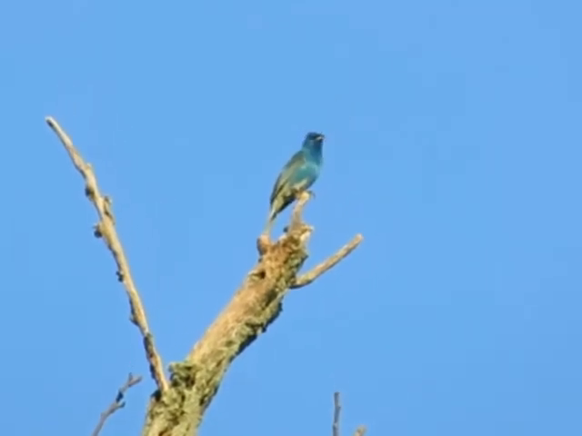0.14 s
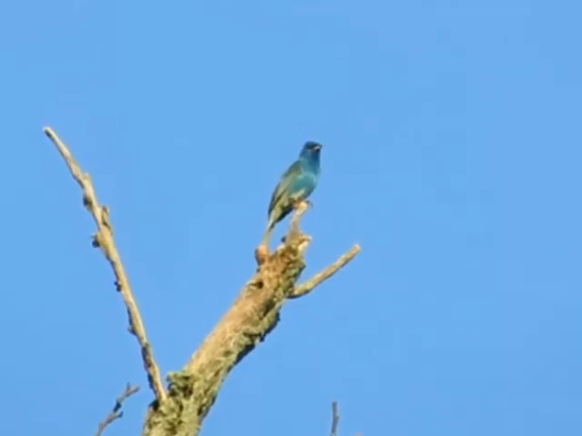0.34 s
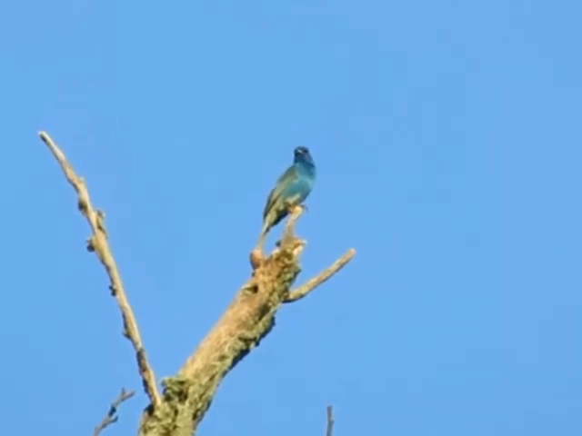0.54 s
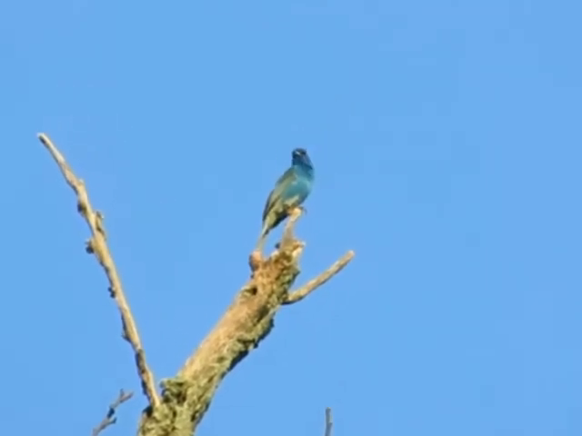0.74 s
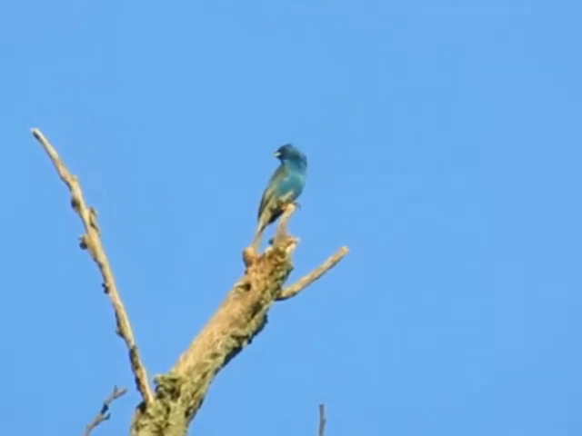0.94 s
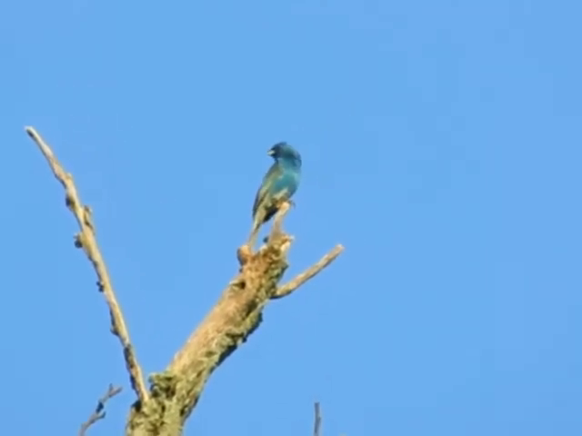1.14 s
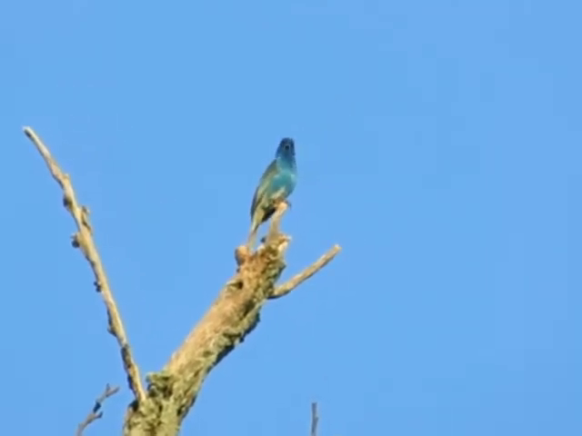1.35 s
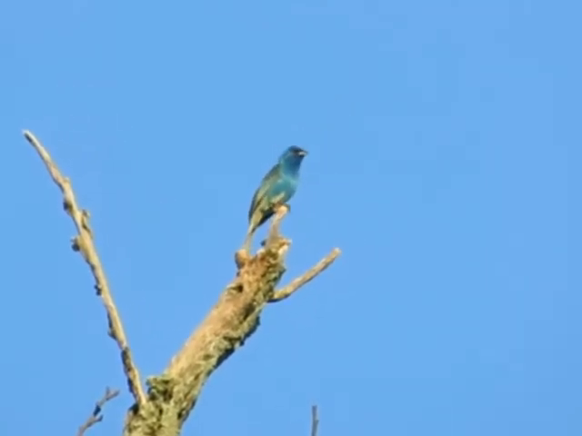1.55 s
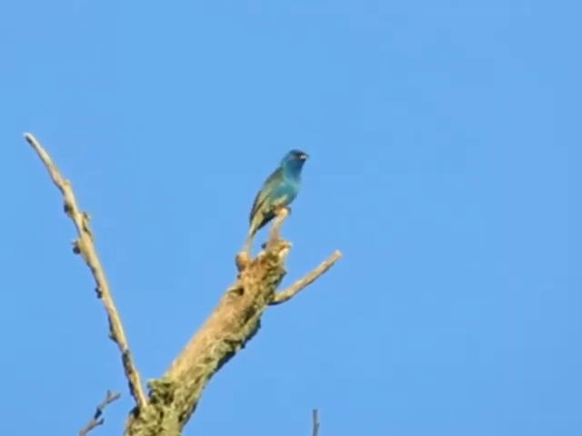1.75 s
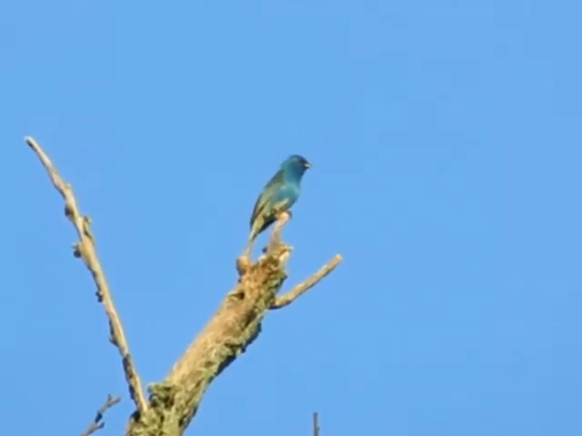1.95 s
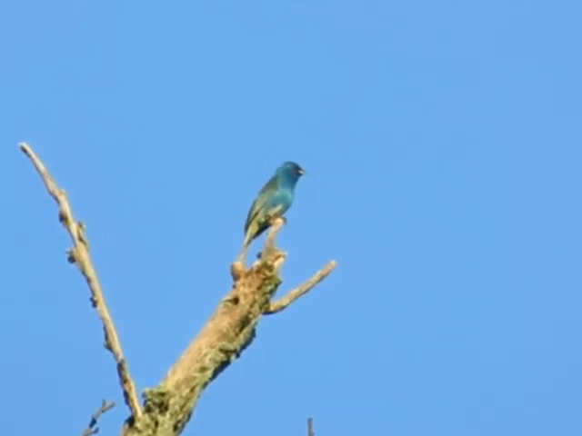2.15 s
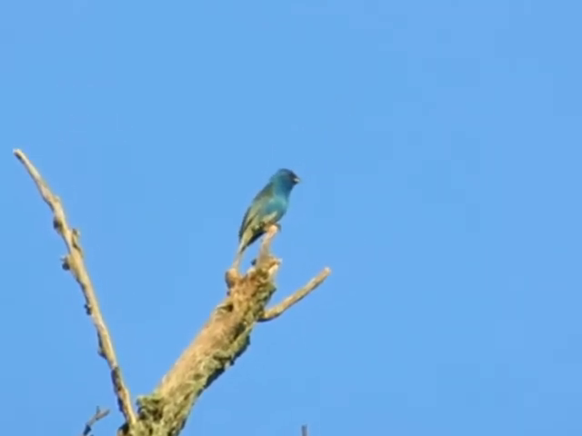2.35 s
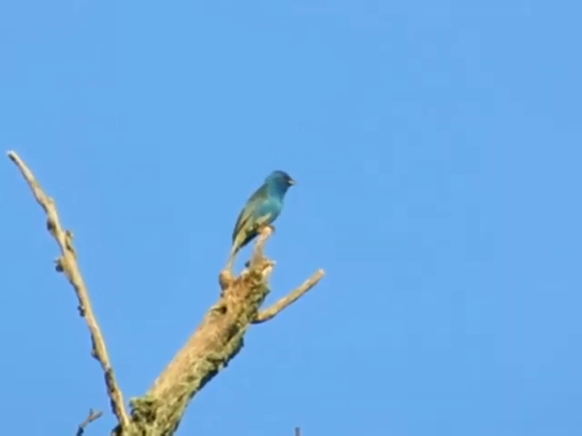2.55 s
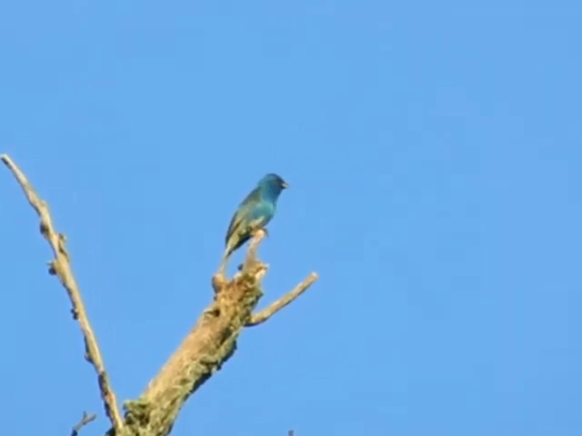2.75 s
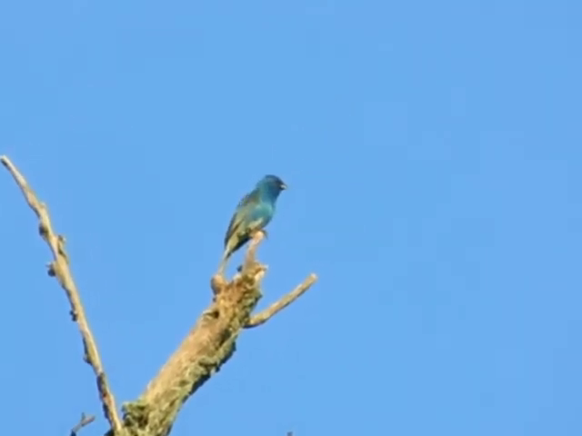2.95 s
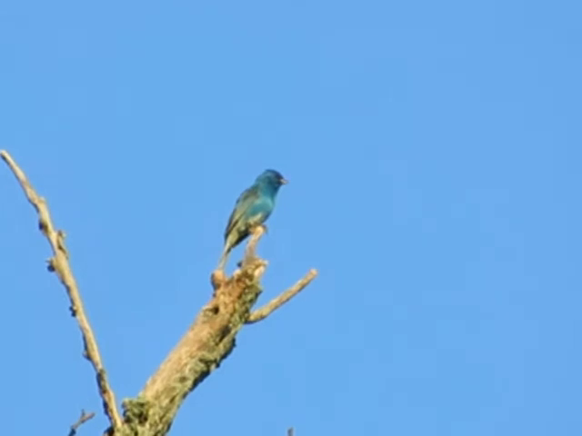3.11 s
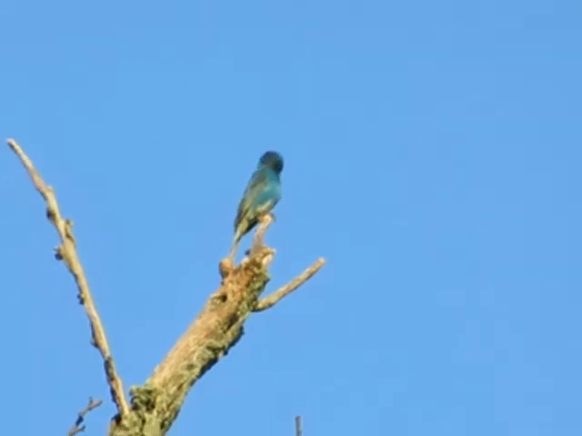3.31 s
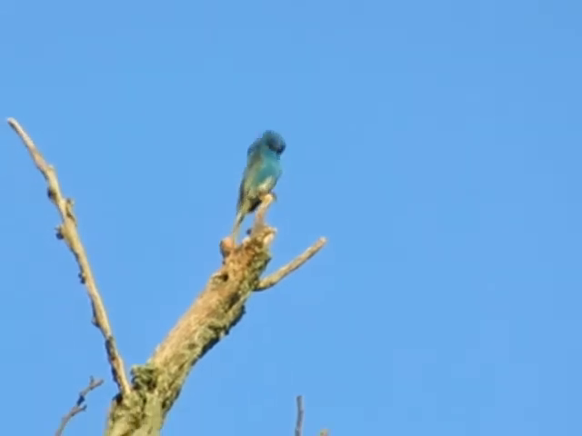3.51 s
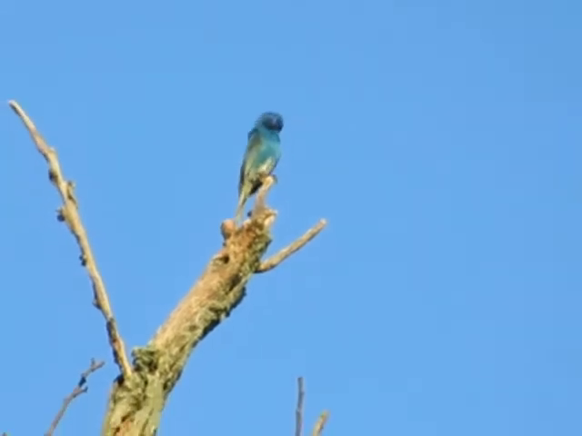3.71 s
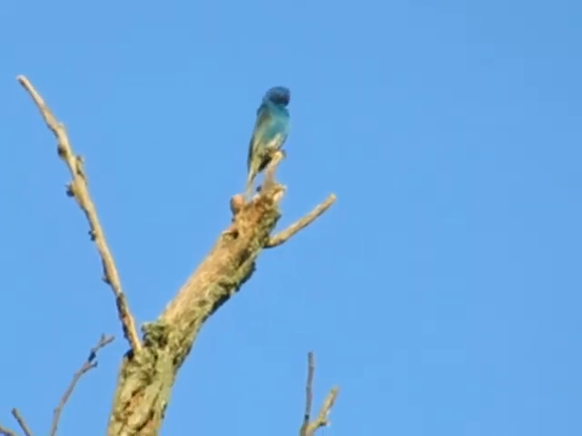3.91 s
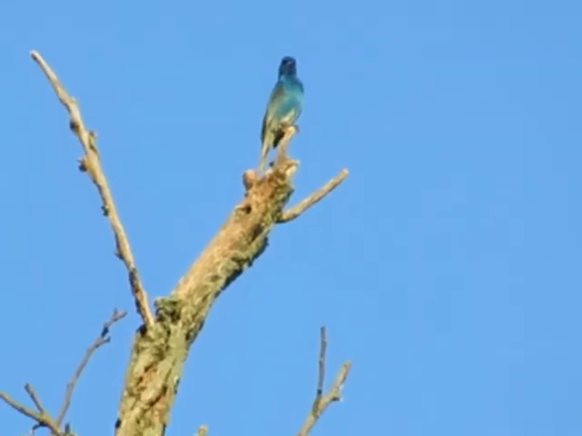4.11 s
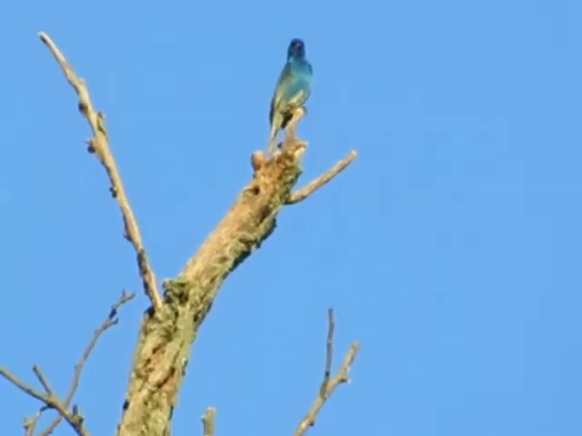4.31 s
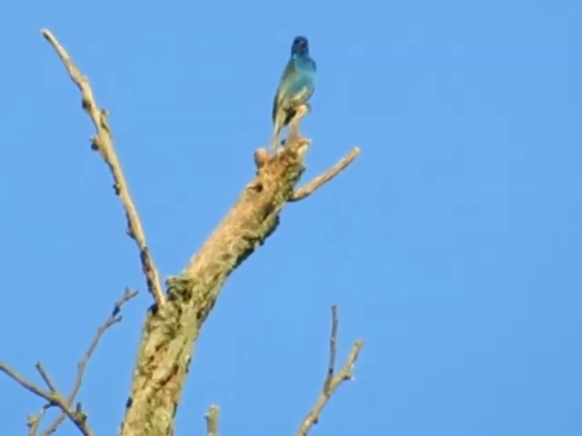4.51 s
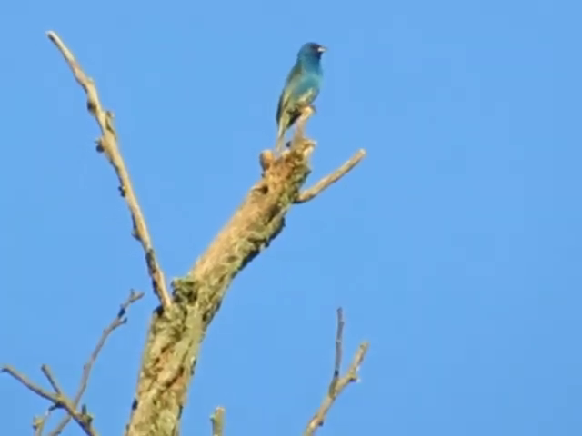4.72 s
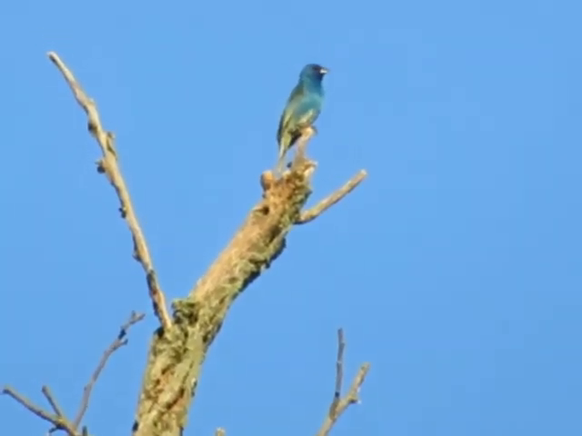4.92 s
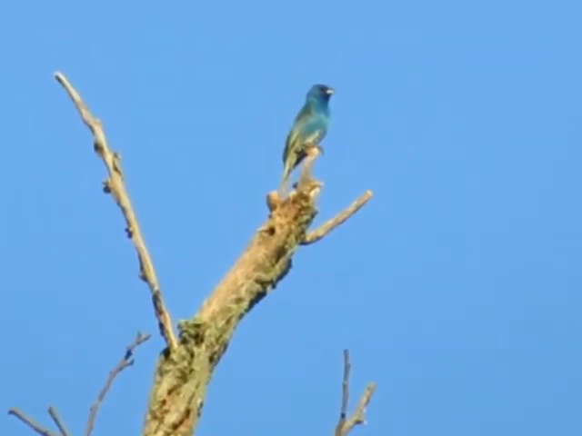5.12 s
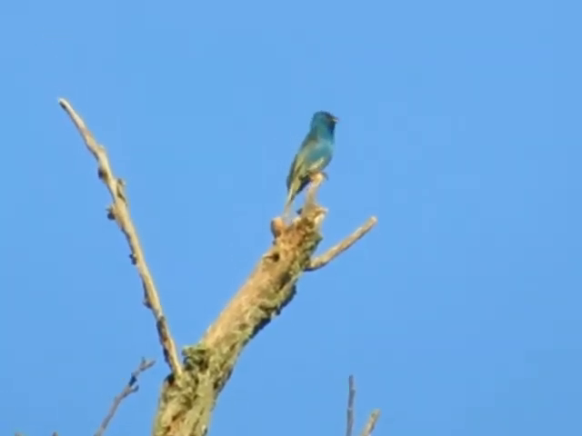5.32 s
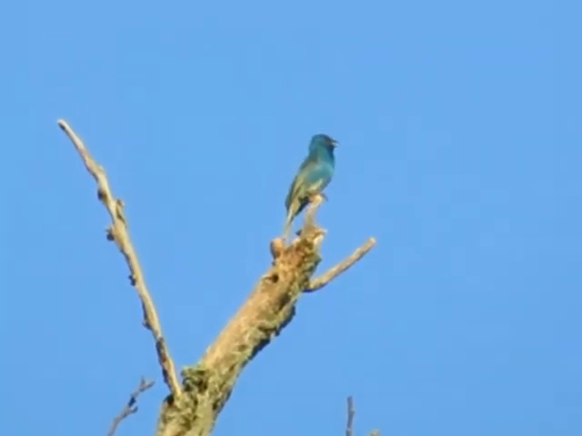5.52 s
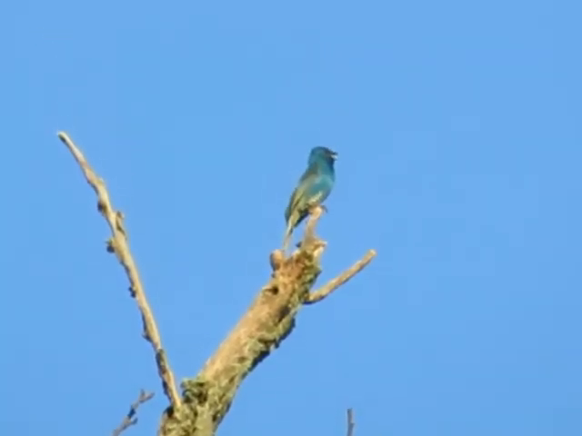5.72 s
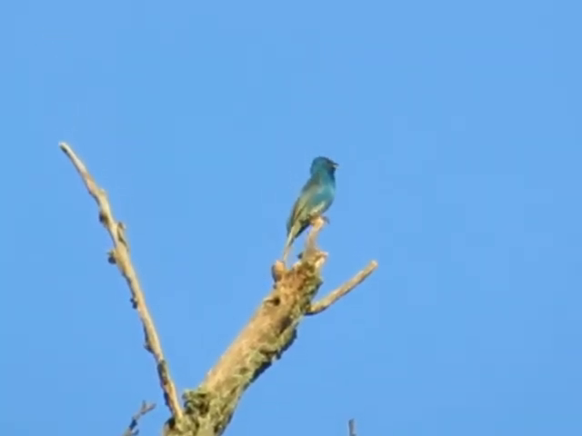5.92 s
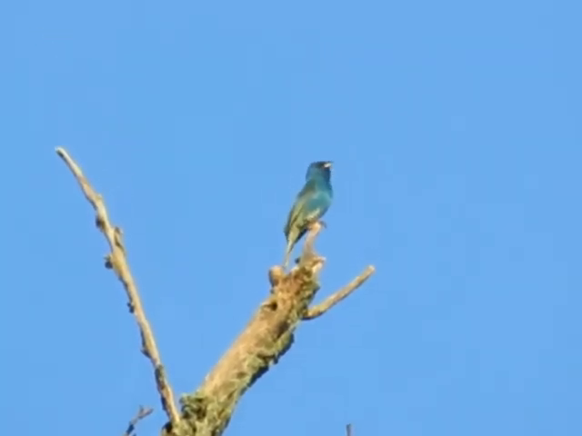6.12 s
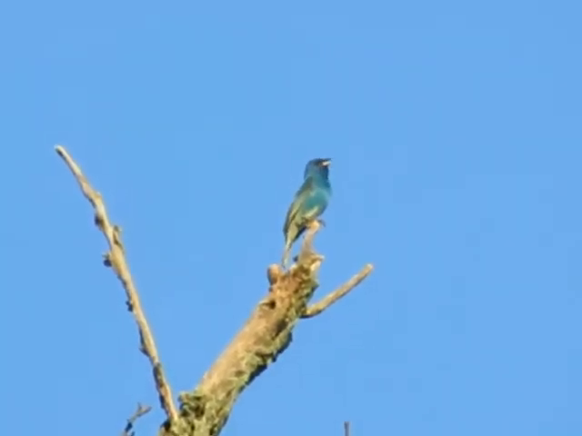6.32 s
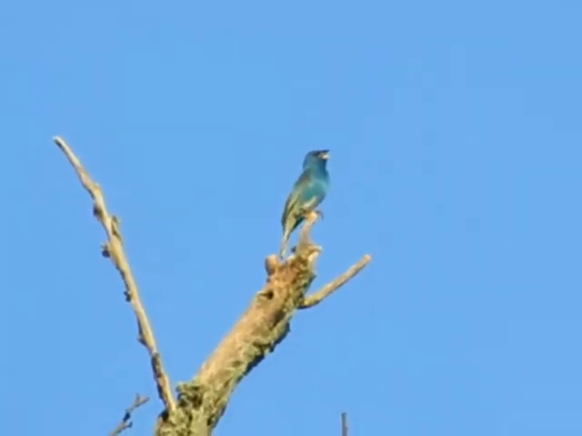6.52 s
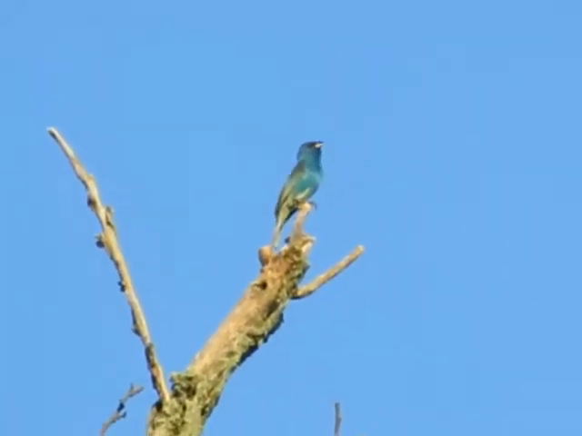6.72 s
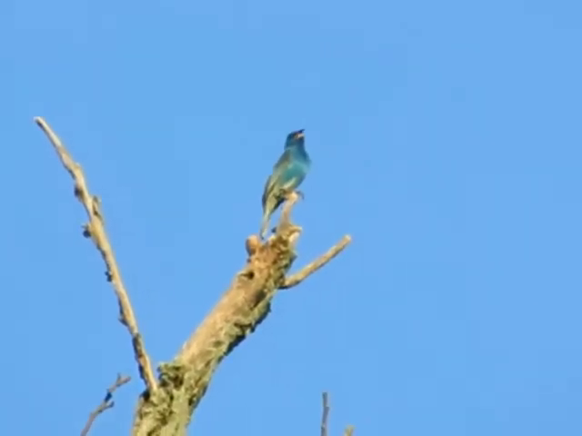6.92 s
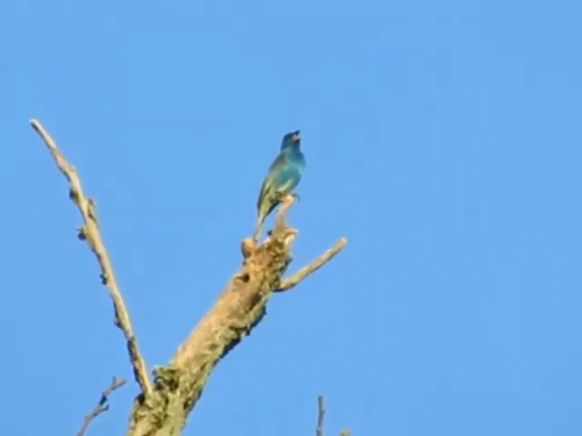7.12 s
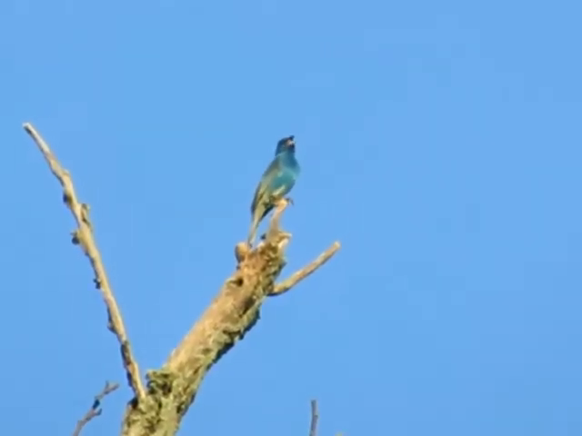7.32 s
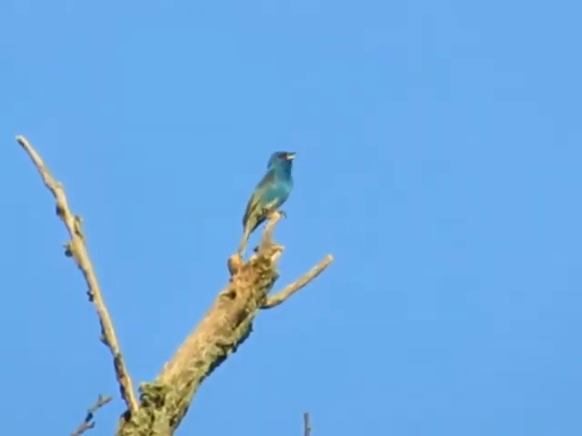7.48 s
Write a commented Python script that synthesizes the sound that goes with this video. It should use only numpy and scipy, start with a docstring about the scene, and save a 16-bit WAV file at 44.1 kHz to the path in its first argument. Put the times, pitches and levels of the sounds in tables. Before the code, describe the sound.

High paired bird notes grow from faint to bright above constant cricket trilling, with distant birds calling, a soft katydid rasp and one twig snap.

```python
"""A small songbird sings a rising series of paired whistles, sweeps and buzzes: near-pure gliding tones.
Other birds call further off with simpler gliding tones, and some hoarsely, with pitch that jumps about.
Crickets trill as narrow bands of noise and one pulsed tone; a katydid rasps in swells of high noise.
A twig snaps as a short dying ring, and traffic, leaves and hiss are coloured noise.
Trees scatter the birds and the snap back as a diffuse tail; a close pair of microphone ports listens."""
import sys
import numpy as np
from scipy import signal
from scipy.fft import rfft, irfft, next_fast_len
from scipy.io import wavfile
from scipy.ndimage import uniform_filter1d

SR = 44100
rng = np.random.default_rng(int(sys.argv[2]) if len(sys.argv) > 2 else 0)


def master(y):
    """Save y as 16-bit WAV."""
    cut = np.clip(np.atleast_2d(y).T, -1, 1)
    pcm = np.round(cut * 32767)  # scale
    wavfile.write(sys.argv[1], SR, pcm.astype(np.int16))


N = 332955
T = np.arange(N) / SR   # time of every sample in seconds
CUTOFF_HZ = 15500       # top of the sound

# Traffic, leaves and hiss, the same in both ports. Each row: pitch in Hz, level in dB per Hz.
AIR_SAME = [(25, -83), (45, -72.5), (63, -69.5), (92, -75.5), (120, -71.5), (165, -77.5), (250, -82.5),
            (500, -88), (1000, -92.5), (1700, -97.3), (3000, -101), (4300, -101), (6300, -104),
            (7500, -110), (10000, -117), (12000, -123), (14500, -133)]
# The part of it that is opposite in the two ports. Each row: pitch in Hz, level in dB per Hz.
AIR_OPPOSITE = [(25, -118), (60, -104), (120, -91.5), (250, -83), (1000, -90.5), (1700, -93.5), (4300, -99),
                (6300, -102), (7500, -105), (10000, -109), (12000, -112), (14500, -116)]
# Bands in which the hiss flickers, each reaching up to the next. Each row: low edge in Hz, spread in dB.
FLICKER_BANDS = [(800, 1.3), (1200, 1.3), (1800, 1.3), (2600, 1.3), (3500, 1.3), (4500, .5), (6200, 2),
                 (7600, 3), (9000, 4.5), (10200, 4.5), (11500, 5.5), (13000, 6)]

# Far cricket chorus. Each row: pitch in Hz, width of each resonance in Hz,
# average level in dB of the part alike in both ports, and of the part opposite in them.
CRICKET_CHORUS = [(5172, 250, -63.5, -76), (5340, 190, -60, -59.5), (5830, 150, -74, -80),
                  (10700, 100, -90, -85)]
# One near cricket. The row: pitch in Hz, pulses per second, sounding share of a pulse (0-1), level in dB.
NEAR_CRICKET_WING = (5366, 38.45, 0.72, -53)
# The katydid's rasps. Each row: middle of the rasp in seconds, level in dB.
KATYDID_RASPS = [(.45, -66), (1.52, -68), (2.52, -72), (3.032, -68), (3.76, -65), (4.65, -64.5),
                 (5.55, -62)]
# A twig snaps. The row: level in dB, ringing pitch in Hz, decay time in seconds.
TWIG_SNAP = (-26.5, 2500, 0.00089)
SNAP_START_S = 6.6812

# Hoarse chirps of distant birds. Each row: start in seconds, end in seconds, first pitch in Hz,
# last pitch in Hz, random pitch scatter in Hz, level in dB.
HOARSE_CHIRPS = [(0.8, .862, 4350, 4800, 298, -55.5), (.843, 0.908, 3750, 3750, 250, -64.5),
                 (2.454, 2.537, 4440, 4700, 303, -59.5), (2.575, 2.61, 4400, 4250, 250, -64),
                 (2.789, 2.828, 4730, 4400, 200, -56.5), (2.82, 2.858, 3850, 3700, 150, -65)]
# Single faint gliding tones, mostly distant birds; the highest, at .42 and 4.65 s, go with the katydid's
# rasps. Each row: start in seconds, length in seconds, first pitch in Hz, last pitch in Hz, level in dB.
FAINT_GLIDES = [(.1, .075, 2320, 2180, -57), (.42, .065, 7450, 7490, -59), (.62, .06, 1800, 2700, -64),
                (.69, .05, 3750, 3660, -65), (.83, .2, 3780, 3800, -67), (1.02, .06, 2700, 2500, -65),
                (1.36, .05, 2000, 2350, -65), (1.49, .05, 3300, 3080, -62), (1.55, .12, 3080, 3040, -61),
                (1.595, .02, 2550, 2150, -61), (1.615, .05, 2030, 2130, -58), (1.7, .04, 2100, 2260, -60),
                (2.803, .036, 2870, 2970, -54), (2.835, .028, 2720, 2350, -58),
                (2.915, .045, 2350, 2050, -58), (2.41, .06, 2330, 2450, -62), (2.965, .04, 2330, 2250, -63),
                (3.14, .03, 2950, 2800, -63), (3.36, .07, 2270, 2120, -58), (3.9, .07, 2310, 2120, -56),
                (4.65, .11, 8080, 8420, -67), (4.89, .09, 6100, 6300, -60), (4.968, .03, 5620, 4200, -46),
                (5.0, .036, 3590, 5250, -52), (5.18, .035, 5340, 4200, -51), (5.31, .09, 6000, 6250, -56),
                (5.1, .035, 2900, 3020, -58), (5.688, .035, 3650, 4140, -46), (5.64, .045, 3100, 3600, -54),
                (5.95, .06, 4300, 4600, -56), (6.596, .025, 2950, 3600, -43), (6.615, .03, 3600, 2950, -48),
                (6.97, .055, 2000, 1980, -60)]
GLIDE_PEAK, GLIDE_EARLY = .55, .6        # share of the length at the peak; share of the glide done by then
GLIDE_IN_DB, GLIDE_OUT_DB = -8, -6       # level of the two ends against the peak
# Phrases that distant birds repeat, by name. Each row: seconds from the phrase start, pitch in Hz, level in dB.
FAR_PHRASES = { "carol": [(0, 2750, -7), (.025, 3080, 0), (.035, 2700, -6), (.045, 2330, -2),
               (.065, 2450, 0), (.09, 2750, -5), (.113, 2250, -1), (.145, 1830, -3), (.18, 2260, -1),
               (.207, 2400, -5)], "step down": [(0, 3130, -3), (.05, 3130, 0), (.08, 2900, -5),
               (.11, 2280, -7), (.128, 2120, -10)], "warble": [(0, 3300, -6), (.009, 4300, -5),
               (.014, 4450, -30), (.021, 4350, -10), (.031, 3400, -1), (.04, 3680, -3), (.047, 3150, -9),
               (.056, 2900, -6), (.066, 3080, -2), (.076, 3560, -1), (.087, 3050, 0), (.098, 2500, -15)], }
# When distant birds sing them. Each row: phrase name, start in seconds, length in seconds,
# pitch as a multiple of the phrase's own, level in dB.
FAR_SONG = [("warble", 1.755, .098, .99, -49.5), ("carol", 2.1, .205, .995, -56.5),
            ("step down", 6.0, .128, 1.001, -49), ("warble", 3.658, .098, 1.01, -50),
            ("carol", 4.887, .21, 1.005, -57.5), ("warble", 5.122, .098, .995, -48),
            ("carol", 5.36, .21, 1.02, -58)]

# The singer's syllables, learnt gestures, by name. Each row: seconds from the start, pitch in Hz, level in dB.
GESTURES = { "slide": [(0, 4950, -4), (.03, 4350, -5), (.052, 3720, 0), (.068, 3780, -5)],
            "pip": [(0, 3080, -9), (.028, 3540, 0), (.05, 3480, -10)], "long fall": [(0, 8300, -26),
            (.03, 7750, -16), (.065, 6930, -12), (.08, 5830, -2), (.092, 4920, 0), (.109, 4400, -7)],
            "hook": [(0, 3600, -6), (.011, 4120, -3), (.022, 4290, 0), (.035, 3980, -8)],
            "hold and fall": [(0, 4860, -13), (.012, 5020, 0), (.026, 5040, 0), (.036, 5020, -9),
            (.05, 4960, -10), (.074, 4100, -6), (.098, 3470, -7.5), (.118, 3170, -14)],
            "high rise": [(0, 5860, -14), (.02, 6010, -1), (.047, 6340, -1), (.063, 6380, 0)],
            "chip": [(0, 8900, -32), (.0085, 5120, 0), (.0175, 8100, -11)], "arch": [(0, 2930, -21),
            (.052, 3130, -12), (.065, 3810, -10), (.078, 4810, 0), (.092, 4910, -3), (.108, 4940, .5),
            (.127, 4920, -3), (.145, 3660, -11), (.168, 2280, -18)], "climb": [(0, 5950, -5),
            (.019, 7000, 0), (.039, 7550, -6)], "trill": [(0, 4560, -12), (.008, 4600, -2), (.019, 4590, 0),
            (.025, 4380, -15), (.031, 4100, -6), (.039, 3700, -9), (.052, 2560, -16), (.067, 3610, -11),
            (.08, 2570, -17), (.0935, 3550, -7), (.1065, 2530, -20)], "plunge": [(0, 5230, -1.5),
            (.014, 8300, -22), (.021, 7700, -36), (.031, 6950, -21), (.052, 5900, -8), (.063, 5150, 0),
            (.074, 4160, -7), (.104, 3080, -8.5), (.126, 2280, -19.5)], "swell": [(0, 2520, -19),
            (.01, 3690, -11), (.025, 4300, -7), (.037, 4450, -15), (.048, 4540, -6), (.058, 4550, -11),
            (.066, 4560, 2.5), (.077, 4560, -2.5), (.089, 4550, -4), (.097, 4540, -20)], }
# The song, mostly in pairs and growing louder. Each row: syllable name, start in seconds,
# length in seconds, pitch as a multiple of the gesture's own, level in dB.
SINGER_SONG = [("slide", 4.27, .067, 1.005, -55), ("pip", 4.47, .05, 1.005, -59),
               ("slide", 4.522, .065, .995, -53), ("pip", 4.7, .05, .995, -61),
               ("slide", 4.75, .077, .995, -49.5), ("long fall", 5.032, .109, 1.005, -49.5),
               ("hook", 5.15, .032, .995, -47), ("long fall", 5.308, .109, .995, -42.5),
               ("hook", 5.42, .038, 1.005, -43), ("hold and fall", 5.552, .122, 1.005, -41.5),
               ("high rise", 5.68, .065, 1.005, -43), ("hold and fall", 5.826, .116, .995, -36),
               ("high rise", 5.955, .06, .995, -40.5), ("chip", 6.0965, .017, .99, -38),
               ("arch", 6.135, .168, 1.01, -30.5), ("chip", 6.3865, .018, 1.01, -35.5),
               ("arch", 6.42, .167, .99, -29.5), ("climb", 6.731, .037, 1.005, -42),
               ("trill", 6.768, .107, .995, -27.5), ("climb", 7.021, .041, .995, -39),
               ("trill", 7.062, .106, 1.005, -26.5), ("plunge", 7.266, .126, 1.001, -28.5),
               ("swell", 7.416, .094, 1.001, -27)]
# Upper partials, multiples of the main tone: almost none near 9 kHz, strongest near 12.5 kHz.
# Each row: the partial's own pitch in Hz, level in dB against the main tone when that stands at -31 dB.
UPPER_PARTIALS = [(9000, -65), (10500, -32), (12500, -21.5), (13700, -28), (15000, -31)]
# The singer's buzzed notes. Each row: start in seconds, end in seconds, level in dB.
BUZZED_NOTES = [(6.6642, 6.735, -36), (6.9516, 7.024, -36)]
BUZZ_START_HZ, BUZZ_END_HZ = 6030, 5660        # middle of the pitch swing
VIBRATO_HZ, BUZZ_SWING_HZ = 150.5, 660         # swings per second; size of the swing at the start
BUZZ_DIP_DB = 4                                # by the end, this much quieter at the top of a swing
BUZZ_ROUGH_HZ, BUZZ_ROUGH_DB = 55, 2.0         # random pitch and level

# The singer starts facing away, so the trees return more of the early song.
# Each row: time in seconds, level sent to the trees in dB.
SINGER_TO_TREES = [(5.9, -6.5), (6.3, -9.5)]
TREES_T60_S, TREES_CUT_HZ = 0.7, 9000          # time for the tail to fall by 60 dB; dullness
EARLY_T60_S, EARLY_DB = .2, -3                 # the nearest crowns give an extra, quickly dying start


def amp(db):
    """Turn dB into a plain multiplier."""
    return 10 ** (np.asarray(db) / 20)


def rms_one(x):
    """Scale a sound so that its average (rms) level is 1."""
    return x / np.sqrt(np.mean(x ** 2) + 1e-20)


def drift(rate_hz):
    """Smooth random wandering with spread 1, made at a fortieth of the sample rate."""
    r = np.exp(-80 * np.pi * rate_hz / SR)
    noise = rng.standard_normal(N // 40 + 2002)
    slow = signal.lfilter([1], [1, -2 * r, r * r], noise)[2000:]   # drop the run-in
    return np.interp(np.arange(N) / 40, np.arange(len(slow)), rms_one(slow))


def resonance(x, hz, width_hz):
    """Let through a narrow band, as a ringing body does, with gain 1 at its peak."""
    r = np.exp(-np.pi * width_hz / SR)
    top = np.array([1, 0, -1]) * (1 - r * r) / 2
    return signal.lfilter(top, [1, -2 * r * np.cos(2 * np.pi * hz / SR), r * r], x)


def lagged(x, lag_s):
    """Sound from one side: it reaches the left port later than the right (earlier if negative)."""
    return np.array([np.interp(T - lag_s, T, x), x])


def air(spectrum):
    """Coloured noise, steady in the bass, flickering band by band above, most in the treble."""
    size = next_fast_len(N)
    hz = np.maximum(np.arange(size // 2 + 1) * SR / size, 1)
    table_hz, table_db = np.transpose(spectrum)
    colour = amp(np.interp(np.log(hz), np.log(table_hz), table_db)) * np.sqrt(SR / 2)
    noise = rfft(rng.standard_normal(size)) * colour
    out = irfft(noise * (hz < FLICKER_BANDS[0][0]), size)[:N]
    for (low_hz, spread_db), (high_hz, _) in zip(FLICKER_BANDS, FLICKER_BANDS[1:] + [(CUTOFF_HZ, 0)]):
        band = irfft(noise * (hz >= low_hz) * (hz < high_hz), size)[:N]
        # the subtracted part keeps the average power about the same
        out += amp(spread_db * (drift(9.0) - spread_db / 9)) * band
    return out


def cricket_chorus():
    """Many far wings blur into narrow noise bands whose level wavers."""
    out = np.zeros((2, N))
    for hz, width_hz, same_db, opposite_db in CRICKET_CHORUS:
        noise = rng.standard_normal((2, N))
        same, opposite = resonance(resonance(noise, hz, width_hz), hz, width_hz)
        swell = amp(1.06 * drift(14.0))
        out += swell * (amp(same_db) * rms_one(same) + amp(opposite_db) * rms_one(opposite) * [[1], [-1]])
    return out


def near_cricket():
    """One near wing keeps its separate pulses; each stroke slows a little, so its pitch sags."""
    hz, per_s, share, db = NEAR_CRICKET_WING
    turn = (per_s * T + 0.03 * drift(1.7)) % 1   # place within the pulse, 0 to 1
    stroke = np.minimum(2.2 * np.sin(np.pi * np.clip(turn / share, 0, 1)), 1)   # steep edges, flat top
    pitch = hz + 12 * drift(8.2) - 60 * (turn - share / 2)
    uneven_db = 2.2 * drift(12.0)
    wing = amp(db + uneven_db) * stroke * np.sin(2 * np.pi * np.cumsum(pitch) / SR)
    return lagged(wing, 2.6e-5)


def katydid():
    """Each rasp is a swell of high noise, mostly opposite in the two ports."""
    swell = sum(amp(db) * np.exp(-((T - s) / 0.041) ** 2) for s, db in KATYDID_RASPS)
    band = signal.butter(2, [7100, 8500], "band", fs=SR, output="sos")
    same, opposite = signal.sosfilt(band, rng.standard_normal((2, N)))
    return swell * (amp(-8) * rms_one(same) + rms_one(opposite) * [[1], [-1]])


def twig_snap():
    """A click rings for a few cycles and dies away."""
    db, hz, decay_s = TWIG_SNAP
    t = np.clip(T - SNAP_START_S, 0, 1)
    return amp(db) * np.sin(2 * np.pi * hz * t) * np.exp(-t / decay_s)


def sway(x, depth_s):
    """Moving leaves stretch and shorten the path, which blurs the pitch."""
    return np.interp(T + depth_s * drift(11.5), T, x)


def trees(x):
    """Scattered echoes from three stands of trees that each sway in their own time, dull and dying."""
    t, size, out = T[:SR], next_fast_len(N + SR), 0
    dull = signal.butter(2, TREES_CUT_HZ, fs=SR, output="sos")
    fade = amp(-60 * t / TREES_T60_S) + amp(EARLY_DB - 60 * t / EARLY_T60_S)
    fade *= np.clip(t / .014, 0, 1)   # the nearest trees stand a few metres off
    for _ in range(3):
        common, own = rng.standard_normal(SR), rng.standard_normal((2, SR))   # shared; one per port
        echoes = signal.sosfilt(dull, (0.85 * common + own) * fade)
        echoes /= np.sqrt(3 * np.sum(echoes ** 2, axis=1, keepdims=True))
        out = out + rfft(sway(x, 0.00022), size) * rfft(echoes, size)
    return irfft(out, size)[:, :N]


def branches(x, db):
    """A few quick echoes from the nearest wood make gliding notes beat."""
    lags_s = rng.uniform(0.00099, .012, size=3)
    return x + amp(db) * sum(np.interp(T - lag_s, T, x) for lag_s in lags_s)


def whistle(t, hz, db, count):
    """A near-pure tone with soft ends; any upper partials are faint, fainter still in quiet notes."""
    edge = np.clip(np.minimum(t - t[0], t[-1] - t) / 0.0031, 0, 1)
    phase = 2 * np.pi * np.cumsum(hz) / SR
    tone = np.sin(phase)
    for k in range(2, count + 1):
        partial_db = np.interp(k * hz, *np.transpose(UPPER_PARTIALS)) + 0.64 * (db + 31)
        tone += amp(partial_db) * np.sin(k * phase) * (k * hz < SR / 2)
    return amp(db) * edge * tone


def notes(breaths, count, round_s):
    """Sound each breath, a list of points; the voice rounds the corners of its pitch and level."""
    out = np.zeros(N)
    width = max(int(round_s * SR), 1)
    for rows in breaths:
        s, hz, db = np.transpose(rows)
        a, b = int(s.min() * SR), int(s.max() * SR)
        pitch = uniform_filter1d(np.interp(T[a:b], s, hz), width, mode="nearest")
        level_db = uniform_filter1d(np.interp(T[a:b], s, db), width, mode="nearest")
        out[a:b] += whistle(T[a:b], pitch, level_db, count)
    return out


def sung(events, shapes):
    """Move each event's shape to its time, length, pitch and level."""
    breaths = []
    for name, start, length, pitch, event_db in events:
        stretch = length / shapes[name][-1][0]
        breaths.append([(start + s * stretch, hz * pitch, db + event_db) for s, hz, db in shapes[name]])
    return breaths


def glided():
    """Each glide swells to its peak, then fades as it runs on to its last pitch."""
    breaths = []
    for start, length, hz0, hz1, db in FAINT_GLIDES:
        peak = (start + GLIDE_PEAK * length, hz0 + GLIDE_EARLY * (hz1 - hz0), db)
        breaths.append([(start, hz0, db + GLIDE_IN_DB), peak, (start + length, hz1, db + GLIDE_OUT_DB)])
    return breaths


def hoarse_birds():
    """A hoarse voice: the pitch jumps about at random within the note."""
    out, scatter = np.zeros(N), drift(150.0)
    for start, end, hz0, hz1, scatter_hz, db in HOARSE_CHIRPS:
        a, b = int(start * SR), int(end * SR)
        pitch = np.linspace(hz0, hz1, b - a) + scatter_hz * scatter[a:b]
        out[a:b] += whistle(T[a:b], pitch, db, count=1)
    return out


def far_tones():
    """Distant birds' phrases and the faint glides, tones without partials whose level flutters."""
    breaths = sung(FAR_SONG, FAR_PHRASES) + glided()
    return notes(breaths, count=1, round_s=0.004) * amp(2.6 * drift(70.0))


def buzzes():
    """The pitch swings so fast that the note turns into a rough buzz; the swing narrows as it goes."""
    out, shake, lumps = np.zeros(N), drift(120.0), drift(90.0)
    for start, end, db in BUZZED_NOTES:
        a, b = int(start * SR), int(end * SR)
        t, part = T[a:b], np.linspace(0, 1, b - a)
        centre = BUZZ_START_HZ + (BUZZ_END_HZ - BUZZ_START_HZ) * part
        swing = np.sin(2 * np.pi * VIBRATO_HZ * (t - start))
        pitch = centre + BUZZ_SWING_HZ * (1 - 0.5 * part) * swing + BUZZ_ROUGH_HZ * shake[a:b]
        level_db = db - BUZZ_DIP_DB * swing * part + BUZZ_ROUGH_DB * lumps[a:b]
        fade = np.minimum(np.minimum(part / .15, (1 - part) / .25), 1)   # in and out
        out[a:b] += whistle(t, pitch, level_db, count=2) * fade
    return out


def singer_bird():
    """The main song: whistled syllables and buzzes; moving air makes the sound flutter."""
    song = notes(sung(SINGER_SONG, GESTURES), count=3, round_s=0.0029)
    return (song + buzzes()) * amp(1.5 * drift(60.0))


def scene():
    """The singer straight ahead, the others with more echo, all over the air and the insects."""
    ground = air(AIR_SAME) + air(AIR_OPPOSITE) * [[1], [-1]]
    insects = cricket_chorus() + near_cricket() + katydid()
    snap, hoarse, far, singer = twig_snap(), hoarse_birds(), far_tones(), singer_bird()
    singer_send = amp(np.interp(T, *np.transpose(SINGER_TO_TREES))) * singer
    wet = trees(singer_send + amp(-6) * far + amp(-2.5) * hoarse + amp(-15) * snap)
    wet *= amp(2.4 * drift(30.0))   # stirring leaves break up the echoes
    distant = lagged(branches(far + amp(-1.5) * hoarse, -11), 4.5e-5) + lagged(snap, -6e-5)
    near = branches(singer, -16)
    return ground + insects + wet + distant + near


def record(dry):
    """Cut the top steeply."""
    return signal.sosfilt(signal.cheby2(14, 70, CUTOFF_HZ, fs=SR, output="sos"), dry)


dry = scene()
out = record(dry)
master(out)
```